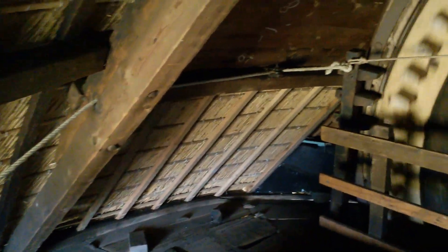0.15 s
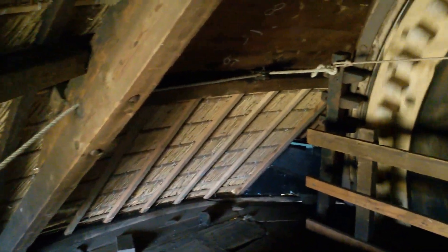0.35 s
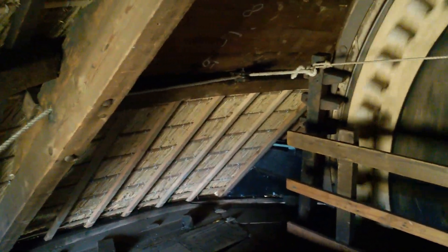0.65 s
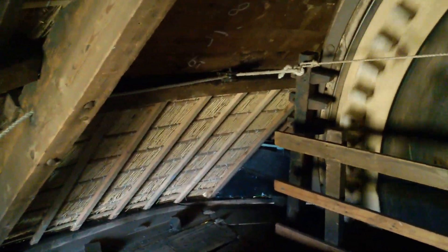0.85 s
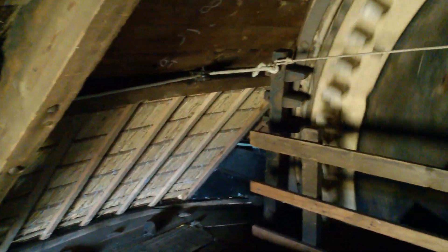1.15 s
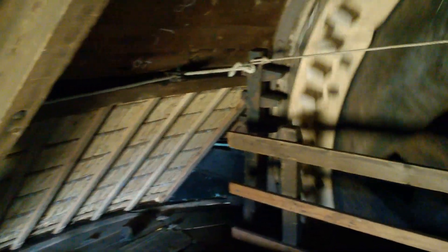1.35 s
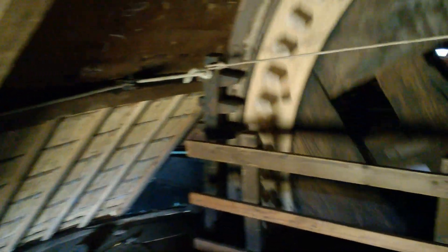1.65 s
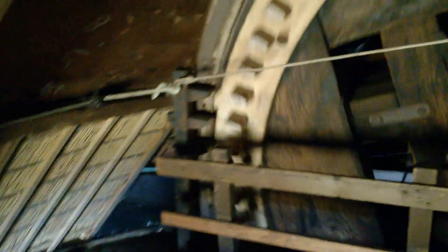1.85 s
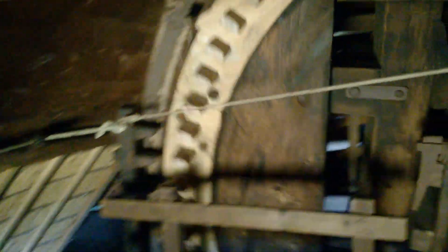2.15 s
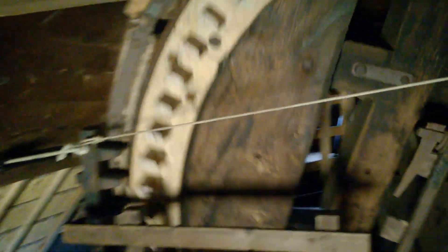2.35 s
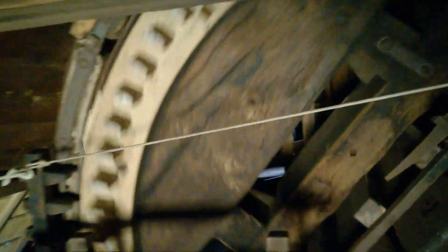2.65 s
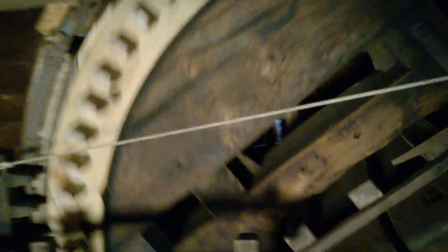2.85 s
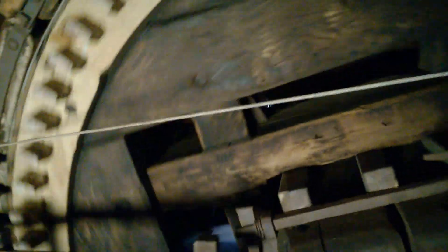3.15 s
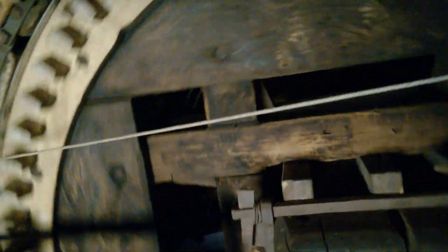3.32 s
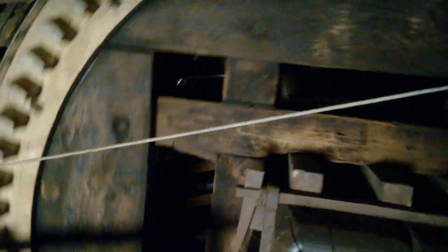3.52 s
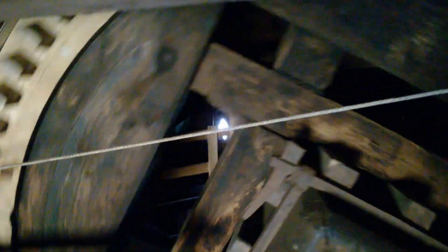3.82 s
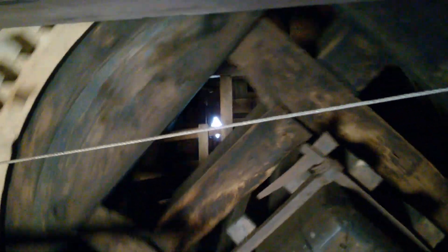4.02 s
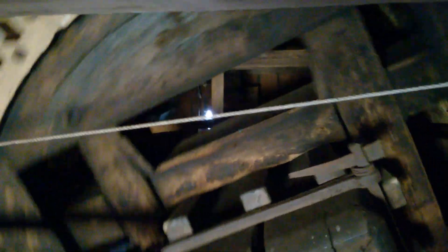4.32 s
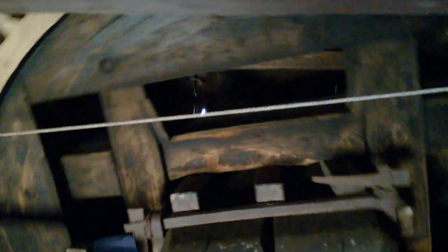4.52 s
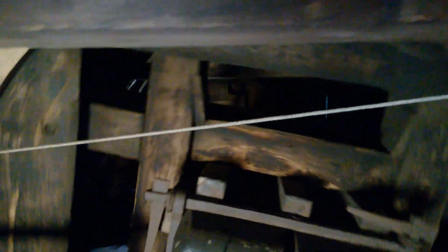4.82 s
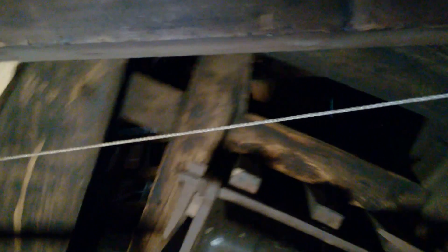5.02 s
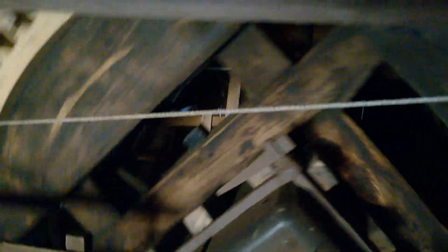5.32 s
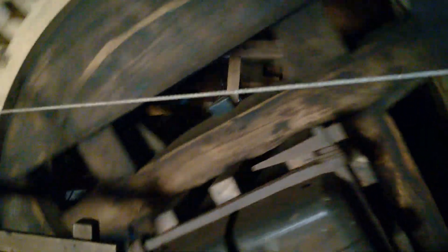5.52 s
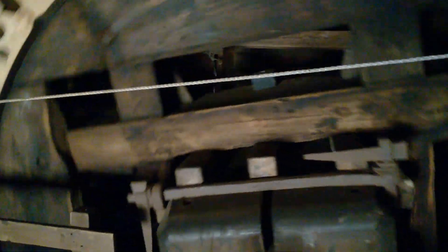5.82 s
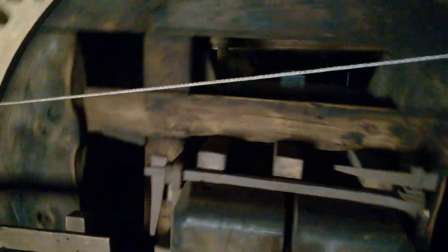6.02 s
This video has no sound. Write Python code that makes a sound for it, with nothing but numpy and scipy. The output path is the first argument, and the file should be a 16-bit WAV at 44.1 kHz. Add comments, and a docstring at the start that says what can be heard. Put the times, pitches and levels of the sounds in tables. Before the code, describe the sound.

Inside a small timber mill cap, a very deep swaying rumble and low grinding run throughout. Wooden cogs knock and clack irregularly, with short juddering scuffs, dry ticks and dull beam thuds. The strongest hollow knock comes around three seconds, a heavy boom follows, and a bright crack lands late. The close microphone sounds slightly dulled, with faint hiss and a brief woody echo.

```python
"""Deep sway and low grinding come first, then wooden clacks and knocks, close by in a mill's small timber cap.
The sway is three wavering sines; shaft rumble and grind are filtered noise whose level follows the load.
Cogs knock, clack and scuff on staves: noise bursts ring wood modes, fade with the room and echo once.
Dull blows ring a beam as decaying sines, and dry ticks are short cracks of noise.
The microphone dulls the treble and a faint air hiss flickers under everything."""
import sys
import numpy as np
from scipy import signal
from scipy.fft import rfft, irfft
from scipy.io import wavfile
from scipy.ndimage import uniform_filter1d

SR = 44100
rng = np.random.default_rng(int(sys.argv[2]) if len(sys.argv) > 2 else 0)


def store_wav(level_fs):
    """Save 16-bit WAV to argv[1]."""
    pcm = np.round(np.clip(np.atleast_2d(level_fs), -1, 1) * 32767)
    wavfile.write(sys.argv[1], SR, pcm.T.astype(np.int16))


def gain_from_db(level_db):
    """Convert decibel levels to linear amplitude factors (20 dB per decade)."""
    decades = np.asarray(level_db, float) / 20
    return 10 ** decades


N = 272097
T = np.arange(N) / SR
CONTACT_T = T[:2 ** 14]  # time within one contact, s

# Decay of the timber room. Each row: frequency in Hz, time to fade by 60 dB in seconds.
ROOM_DECAY = [(500, 0.19), (2000, 0.22), (6000, 0.14), (12000, 0.18)]


def level(x, db):
    """Scale to an rms level."""
    return x * gain_from_db(db) / np.sqrt(np.mean(x ** 2))


def bin_hz(size):
    """Frequencies for the spectrum of a block, one bin up so that the logarithm exists."""
    return np.arange(1, size // 2 + 2) * SR / size


def shaped(x, points):
    """Filter by (Hz, dB) points, joined along log frequency."""
    hz, db = np.transpose(points)
    gain = gain_from_db(np.interp(np.log(bin_hz(len(x))), np.log(hz), db))
    return irfft(rfft(x) * gain, len(x))


def ring(x, hz, width_hz):
    """One resonance, gain 1 at its centre."""
    return signal.lfilter(*signal.iirpeak(hz, hz / width_hz, SR), x)


def walk(rate, size=N):
    """Random levels held 1 / rate s and slewed twice."""
    k = int(SR / rate)
    steps = np.repeat(rng.standard_normal(size // k + 1), k)
    return uniform_filter1d(uniform_filter1d(steps, k), k)[:size]


def add(out, s, x):
    """Mix x into out from time s."""
    i = int(s * SR)
    out[i:i + len(x)] += x[:len(out) - i]


def sway():
    """Deep modes of the frame whose pitch wavers a little."""
    # Frame modes: pitch of each in Hz.
    mode_hz = [27.8, 36.36, 73.7]
    # Frame motion. Each row: time in seconds, then the rms level in dB of each mode, about which it flickers.
    motion = [(0.03, -23.5, -18, -64), (0.11, -26, -34, -38.5), (1.07, -25.5, -27, -35.5),
              (1.21, -30, -17, -61), (1.24, -41, -21, -37.5), (1.72, -34.5, -30, -43),
              (2.14, -22, -20, -43.5), (2.4, -22.5, -29, -45), (2.47, -24.5, -29, -63),
              (2.57, -30, -18.5, -46), (2.62, -27, -31, -40), (3.08, -33.5, -28.5, -38),
              (3.22, -26, -20.5, -53), (3.25, -25, -17, -45), (3.51, -26, -18.5, -49.5),
              (3.78, -16, -21.5, -30), (3.93, -25, -27.5, -44), (4.38, -35, -36.5, -50),
              (4.58, -24.5, -40.5, -46), (4.78, -23.5, -19, -39), (4.94, -19.5, -24.5, -48),
              (5.18, -34, -27.5, -38), (5.5, -27, -28, -49), (6.15, -31, -28.5, -40.5)]
    s, *mode_dbs = np.transpose(motion)
    out = 0
    for hz, db in zip(mode_hz, mode_dbs):
        pitch = hz * (1 + 0.0406 * walk(4.2) + 0.046 * walk(22))
        phase = np.cumsum(pitch) / SR + rng.random()  # in cycles
        loudness = gain_from_db(np.interp(T, s, db) + 3.2 * walk(17))
        out = out + np.sqrt(2) * loudness * np.sin(2 * np.pi * phase)
    return out


def rumble(s, gain_db):
    """Shaft rumble: low noise that swells with the load."""
    # Colour of the shaft. Each row: frequency in Hz, relative filter gain in dB.
    shaft_colour = [(26, -38), (45, -0.5), (62, -3), (102, -10.5), (187, -14.5), (352, -30), (400, -42.5),
                    (520, -57.5), (880, -120)]
    steady = level(shaped(rng.standard_normal(N), shaft_colour), 9.8)
    return steady * gain_from_db(np.interp(T, s, gain_db) + 2.3 * walk(14))


def grind(s, gain_db):
    """Grind of many faint contacts that blur in the room: their summed power sets the noise level."""
    # Colour of the grind. Each row: frequency in Hz, relative filter gain in dB.
    grind_colour = [(120, -22.5), (200, 0.5), (355, -6.5), (1120, -23), (1480, -24), (2040, -26),
                    (2440, -32), (3500, -40.5), (4550, -60), (7700, -120)]
    contacts = (rng.random(N) < 60 / SR) * gain_from_db(3.35 * rng.exponential(size=N))  # about 60 a second
    power = signal.lfilter([1], [1, -np.exp(-1 / (0.029 * SR))], contacts ** 2)  # fades in 29 ms
    blur = np.sqrt(2.8 + power)
    steady = level(shaped(rng.standard_normal(N) * blur, grind_colour), 0.11)
    return steady * gain_from_db(np.interp(T, s, gain_db) + 1.1 * walk(8))


def works():
    """Shaft and gearing turn under one changing load."""
    # Load on the works. Each row: time in seconds, rumble gain in dB, grind gain in dB.
    load = [(0.03, -45.5, -45.5), (0.3, -46.5, -39), (0.9, -49, -50.5), (1.24, -41, -44.5),
            (1.51, -45.5, -42.5), (1.91, -44.5, -43.5), (2.3, -47, -44.5), (2.65, -45.5, -47.5),
            (2.79, -44, -48.5), (2.98, -47, -41), (3.4, -49, -47), (3.68, -43, -33), (3.8, -45, -46),
            (4.34, -48.5, -46), (4.72, -45.5, -43.5), (4.89, -45, -45), (5.01, -49, -52.5),
            (5.13, -47.5, -47.5), (5.28, -44, -41), (5.45, -49.5, -51), (5.79, -41.5, -46),
            (6.15, -48, -50.5)]
    s, rumble_db, grind_db = np.transpose(load)
    return rumble(s, rumble_db) + grind(s, grind_db)


def room_bands():
    """Noise split into regions that sum to the whole, one for each decay time of the room."""
    noise = rng.standard_normal(N + SR)
    spectrum = rfft(noise)
    room_hz = np.transpose(ROOM_DECAY)[0]
    log_hz = np.log(bin_hz(len(noise)))
    shares = [np.interp(log_hz, np.log(room_hz), row) for row in np.eye(len(ROOM_DECAY))]
    return np.array([irfft(spectrum * share, len(noise)) for share in shares])


def delayed(delay_s):
    """Spectrum of a pure delay, for one contact."""
    return np.exp(-2j * np.pi * bin_hz(len(CONTACT_T)) * delay_s)


def body_gain(body_db):
    """Noisy body of a contact, lumpy in its own way since every cog has its own colour."""
    # Corner frequencies of the body, in Hz.
    corner_hz = [150, 600, 1400, 3200, 9000, 16000]
    # Widths in Hz of the bands about 600, 3200 and 9000 Hz in which the body levels are given.
    band_width_hz = np.array([600, 3000, 8000])
    f = bin_hz(len(CONTACT_T))
    # band level to level per Hz, against white noise of rms 1
    low, high, air = body_db + 10 * np.log10(SR / 2 / band_width_hz)
    corner_db = [low - 13, low, (low + high) / 2 - 1.5, high, air, air - 10]
    lump_hz = np.arange(0, SR / 2, 300)
    lump_db = 2.2 * np.interp(f, lump_hz, rng.standard_normal(len(lump_hz)))
    return gain_from_db(np.interp(np.log(f), np.log(corner_hz), corner_db) + lump_db)


def wood_gain(ring_db, ring_hz, spread):
    """Modes of cogs and staves, favoured near ring_hz; spread is in log frequency."""
    # Wood modes. Each row: frequency in Hz, width in Hz, relative level in dB.
    wood = [(417, 30, 6), (516, 88, 4), (672, 12, -25.5), (970, 12, -13), (1185, 66, -4.5),
            (1287, 41, -4.5), (1370, 60, 0), (1460, 40, -2), (1800, 190, 8), (2120, 85, 6),
            (2520, 100, -4.5), (2970, 50, 9), (3230, 30, -5), (3650, 40, -34.5), (3820, 61, -26),
            (4460, 60, 3.5), (4380, 23, -9), (5300, 58, 10), (1080, 40, -5), (1620, 120, 9.5),
            (1990, 90, -5), (2100, 40, 3.5), (2590, 26, -31), (630, 10, -19.5)]
    crest_db = 17.5  # allowance from the peak of a ring to its rms
    hz, width, mode_db = np.transpose(wood)
    modes = 1 / (1 + 2j * (bin_hz(len(CONTACT_T)) - hz[:, None]) / width[:, None])
    near = (gain_from_db(mode_db) * np.exp(-(np.log(hz / ring_hz) / spread) ** 2)) @ modes
    return near * gain_from_db(ring_db - crest_db) / np.sqrt(np.mean(abs(near) ** 2))


def contact(out, bands, s, ring_db, ring_hz, body_db, rise_s, hold_s, spread, plank=1, judder=1):
    """Wood on wood: a sharp front, a held stretch, a tail the room fades, treble soonest."""
    t60 = np.transpose(ROOM_DECAY)[1]
    fade = gain_from_db(-60 * np.maximum(CONTACT_T - hold_s, 0) / t60[:, None])
    fade = fade * (1 - np.exp(-CONTACT_T / rise_s))
    i = int(s * SR)
    burst = np.sum(fade * bands[:, i:i + len(CONTACT_T)], axis=0) * judder
    echo = 1 + gain_from_db(-15.5) * delayed(0.024)  # the far side of the cap throws each blow back
    gain = body_gain(body_db) * plank + wood_gain(ring_db, ring_hz, spread)
    add(out, s, irfft(rfft(burst) * gain * echo, len(CONTACT_T)))


def clacks(bands):
    """Clacks close to a plank, whose reflection cuts their noisy body into bands."""
    # Clacks. Each row: start in seconds, nominal ring peak in dB, body level in dB at 600, 3200 and 9000 Hz.
    clack_list = [(0.032, -59, -51, -60, -56), (0.066, -41, -47.5, -54, -62), (0.144, -29, -42, -54, -57),
                  (0.356, -27, -39.5, -56, -58.5), (1.028, -46, -49, -55, -54.5),
                  (2.636, -32.5, -42.5, -55, -62), (2.713, -46, -67, -52.5, -60),
                  (2.823, -26, -41, -50, -53.5), (4.768, -30.5, -38, -42.5, -50.5),
                  (5.2213, -36, -55, -61, -55), (5.9643, -45, -47, -60, -59.5)]
    band_hz = 1010  # spacing of the bands
    plank = 1 + 0.55 * delayed(1 / band_hz)
    out = np.zeros(N)
    for s, ring_db, *body_db in clack_list:
        contact(out, bands, s, ring_db, 2 * band_hz, body_db, 0.00089, 0.0042, 0.33, plank)
    return out


def ticks():
    """Dry ticks close by: millisecond cracks with a faint short tail, through a broad 11 kHz resonance."""
    # Ticks. Each row: start in seconds, noise level in dB ahead of the resonance.
    tick_list = [(0.0333, -43), (0.451, -40), (0.464, -38), (0.8724, -45), (1.0091, -47), (1.041, -34),
                 (1.198, -33), (1.7973, -39.5), (2.227, -31), (2.241, -31), (2.827, -37), (3.13, -47),
                 (3.71, -43), (3.7773, -55), (3.9589, -45), (4.569, -30.5), (5.2934, -24), (5.7543, -40)]
    out, t = np.zeros(N), T[:SR // 20]
    shape = np.exp(-t / 0.00081) + gain_from_db(-12.5) * np.exp(-t / 0.011)
    for s, db in tick_list:
        add(out, s, gain_from_db(db) * rng.standard_normal(len(t)) * shape)
    return ring(out, 11000, 7000)


def booms():
    """A soft push sets one beam mode ringing; the load on the beam makes it judder."""
    # Dull blows on the beam. Each row: start in seconds, level in dB ahead of the judder, pitch in Hz, push in ms.
    boom_list = [(0.648, -31, 179.7, 1.7), (0.177, -34, 190.3, 17), (1.059, -31.5, 183, 16),
                 (1.31, -26, 179.5, 12), (1.6, -28.5, 169, 56), (2.43, -29, 139, 16),
                 (2.676, -28.5, 193.4, 3.1), (3.439, -30.5, 179, 17), (3.579, -23.5, 178.8, 11),
                 (3.611, -13, 183, 7), (4.035, -28.5, 169.5, 24), (4.498, -28, 175.5, 2),
                 (4.59, -29, 185, 5), (4.78, -24.5, 174.5, 8.7), (4.854, -19.5, 180.8, 1.8),
                 (5.062, -21.5, 178, 7.1), (5.294, -26, 126.5, 9.2), (5.446, -24.5, 177.4, 1.9),
                 (5.999, -31, 175, 15)]
    t60_s = 0.34
    out, t = np.zeros(N), T[:SR // 2]
    for s, db, hz, push_ms in boom_list:
        envelope = (1 - np.exp(-1000 * t / push_ms)) * gain_from_db(db - 60 * t / t60_s)
        add(out, s, envelope * np.sin(2 * np.pi * hz * t))
    return out * gain_from_db(3.9 * walk(65))


def blow(out, bands, s, ring_db, ring_hz, low_db, high_db):
    """A cog strikes a stave; the 9 kHz level follows the 3200 Hz level and drops for dull blows."""
    dullness_db = low_db - high_db
    air_db = -54.5 + 0.58 * (high_db + 45) - max(dullness_db - 18.5, 0)
    # a duller blow is a softer contact, so it builds more slowly
    rise_s = 0.00079 * gain_from_db(np.clip(0.58 * dullness_db, 0, 26))
    # it lands as several small contacts: a level that wavers at 400 steps a second
    grain = gain_from_db(2 * walk(400, size=len(CONTACT_T)))
    # first reflections hold the level for 2.2 ms
    contact(out, bands, s, ring_db, ring_hz, [low_db, high_db, air_db], rise_s, 0.0022, 0.12, judder=grain)


def faint_blows(bands):
    """Equally faint cog blows at random moments, 8 a second on average."""
    out = np.zeros(N)
    for s in rng.random(int(8 * N / SR)) * N / SR:
        blow(out, bands, s, ring_db=-50, ring_hz=1080, low_db=-54, high_db=-63)
    return out


def knocks(bands):
    """The louder cog blows, each ringing the wood modes near its own centre."""
    # Knocks. Each row: start in seconds, nominal ring peak in dB, ring centre in Hz,
    # body level in dB at 600 Hz, body level in dB at 3200 Hz.
    knock_list = [(0.21, -39, 1040, -40, -58.5), (0.429, -39, 1100, -40, -54.5),
                  (0.4482, -18, 2570, -29, -23.5), (0.54, -34, 1280, -38.5, -59),
                  (0.619, -46, 1910, -60, -62), (0.6714, -41, 1090, -51, -67),
                  (0.83, -35, 1150, -35.5, -56.5), (0.927, -56, 1000, -51, -65.5),
                  (1.078, -45, 696, -42.5, -83), (1.1444, -60, 1060, -53, -54.5),
                  (1.3084, -24.5, 1150, -36.5, -58), (1.379, -64, 1170, -46, -68),
                  (1.7282, -29, 1330, -32.5, -40), (1.882, -40, 1130, -47.5, -55),
                  (2.097, -56, 1060, -55, -62), (2.3163, -31, 1130, -28, -44.5),
                  (2.428, -46, 2180, -47.5, -56.5), (2.899, -21, 1810, -35, -78),
                  (2.953, -32, 1090, -52, -59), (3.0385, -41, 1010, -40, -80), (3.0931, -6, 1336, -22, -49),
                  (3.225, -47, 1020, -56, -61.5), (3.31, -45, 2470, -49, -60),
                  (3.3532, -31, 1120, -40.5, -56), (3.4137, -43, 1060, -40.5, -55),
                  (3.502, -53, 1080, -55, -55), (3.545, -57, 1040, -39, -53.5),
                  (3.5747, -23, 1190, -34, -53.5), (3.636, -22, 1030, -25.5, -69),
                  (3.6706, -35, 600, -41, -60), (3.916, -36, 1180, -55, -58.5),
                  (3.9578, -30, 1800, -43, -43), (4.043, -27.5, 1240, -33.5, -68),
                  (4.2063, -37, 1950, -50.5, -47.5), (4.2846, -30, 1730, -32.5, -63),
                  (4.5032, -58, 1140, -38, -55.5), (4.5706, -35, 925, -33.5, -42),
                  (4.6455, -60, 1160, -64, -57), (4.878, -66, 1170, -39.5, -64),
                  (5.006, -56, 1090, -51, -63.5), (5.1112, -39, 2020, -52, -56.5),
                  (5.295, -45, 1110, -25.5, -38), (5.36, -32, 1240, -46, -65), (5.439, -48, 1590, -42, -67),
                  (5.4896, -25, 1220, -33.5, -56.5), (5.6284, -14.5, 2120, -28.5, -25),
                  (5.6974, -42, 1790, -37, -58), (5.838, -30, 1427, -37.5, -56),
                  (6.076, -34, 1140, -41.5, -65)]
    out = np.zeros(N)
    for s, ring_db, ring_hz, low_db, high_db in knock_list:
        blow(out, bands, s, ring_db, ring_hz, low_db, high_db)
    return out


def scuffs(bands):
    """Cogs sliding along a stave: longer contacts whose level judders as they stick."""
    # Scuffs. Each row: start in seconds, nominal ring peak in dB, body level in dB at 600, 3200 and 9000 Hz.
    scuff_list = [(1.1962, -37, -56, -72, -71), (1.4664, -39, -49, -57, -55.5),
                  (1.489, -37, -41.5, -51.5, -56.5), (1.549, -35, -41.5, -57, -63),
                  (1.6024, -41, -43.5, -50.5, -53), (1.6594, -44, -51, -63, -58),
                  (2.1615, -42, -43.5, -50.5, -56.5), (2.224, -35, -45.5, -43, -48.5),
                  (2.287, -46, -52, -59, -62.5), (3.5972, -32.5, -39, -60, -63),
                  (3.759, -43, -40.5, -53, -56.5), (5.739, -36.5, -40, -58, -65),
                  (5.775, -45, -37, -46.5, -58.5)]
    out = np.zeros(N)
    for s, ring_db, *body_db in scuff_list:
        stick = gain_from_db(1.5 * walk(67, size=len(CONTACT_T)))
        contact(out, bands, s, ring_db, 2000, body_db, 0.00075, 0.035, 0.42, judder=stick)
    return out


def scene():
    """Frame, works, beam and gearing together in the cap."""
    bands = room_bands()
    gearing = clacks(bands) + faint_blows(bands) + knocks(bands) + scuffs(bands)
    return (sway() + works() + gearing + ticks() + booms())[None]


def microphone(x):
    """The microphone loses treble above its port resonance."""
    mirrored = np.r_[x, x[::-1]]  # so that the filter wraps without a jump
    return shaped(mirrored, [(5000, -0.5), (6300, -1.5), (7200, -7), (16000, -17)])[:N]


def air_hiss():
    """Faint hiss of air whose level flickers."""
    # Colour of the hiss. Each row: frequency in Hz, relative filter gain in dB.
    hiss_colour = [(1500, -17), (2500, -14), (4000, -4), (6200, -1.5), (7200, -15.5), (10000, -13.5),
                   (15600, -14)]
    steady = level(shaped(rng.standard_normal(N), hiss_colour), -71.5)
    return steady * gain_from_db(2.5 * walk(15))


def low_pass(x):
    """Removes everything above the highest recorded frequency."""
    return signal.sosfilt(signal.butter(12, 15800, fs=SR, output="sos"), x)


def record(dry):
    """The cap through the microphone, with air hiss under it."""
    mix = microphone(dry[0]) + air_hiss()
    return low_pass(mix[None])


dry = scene()
out = record(dry)
store_wav(out)
```